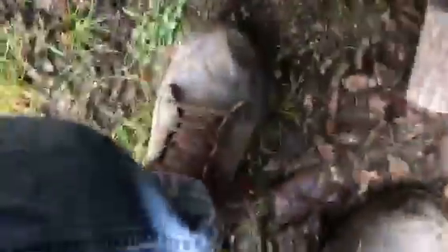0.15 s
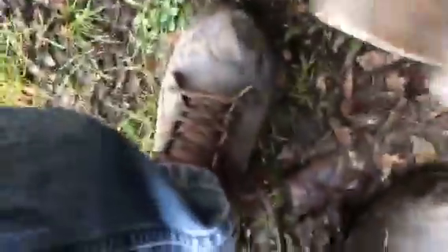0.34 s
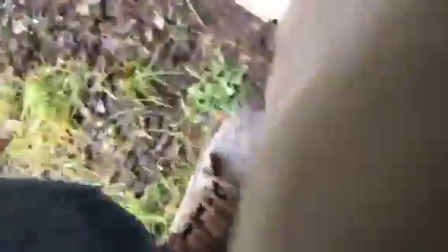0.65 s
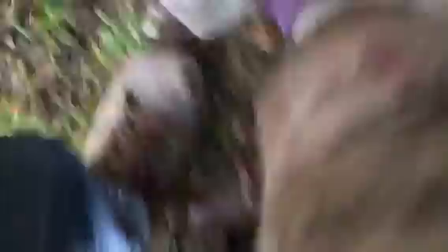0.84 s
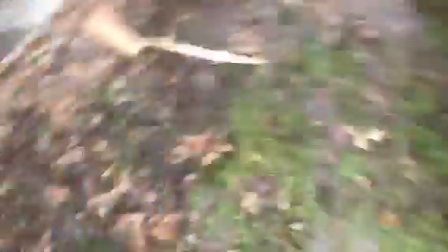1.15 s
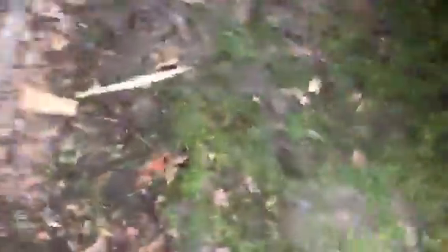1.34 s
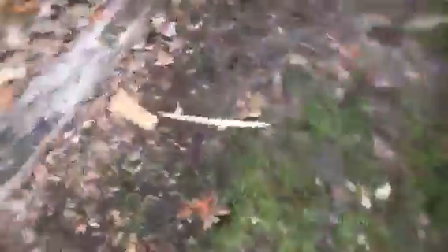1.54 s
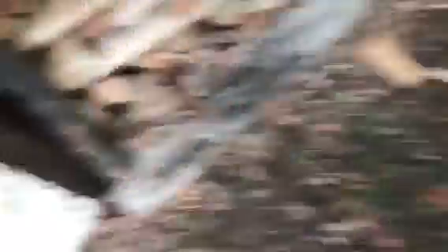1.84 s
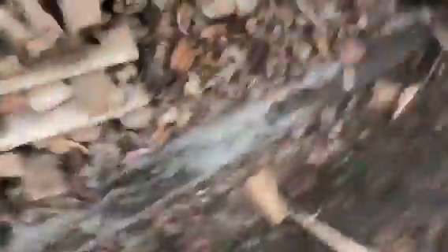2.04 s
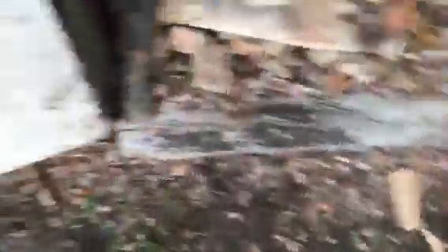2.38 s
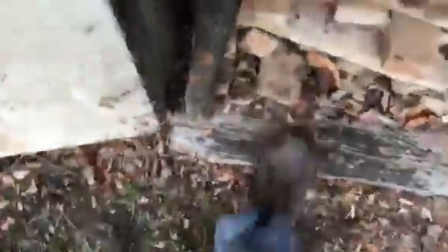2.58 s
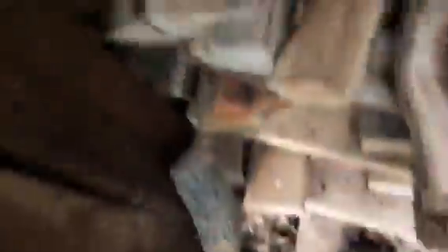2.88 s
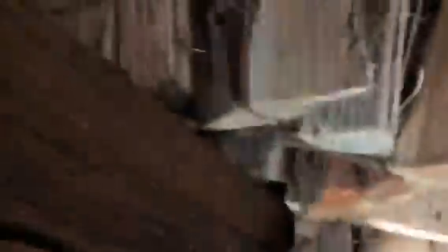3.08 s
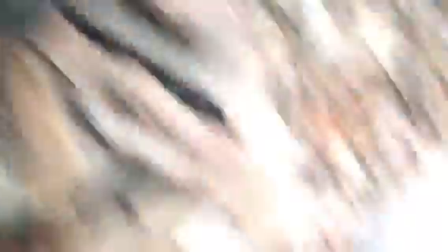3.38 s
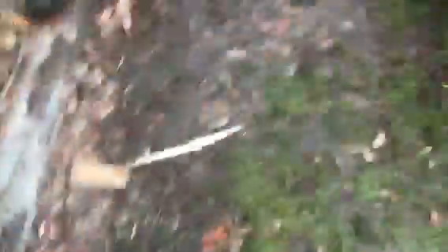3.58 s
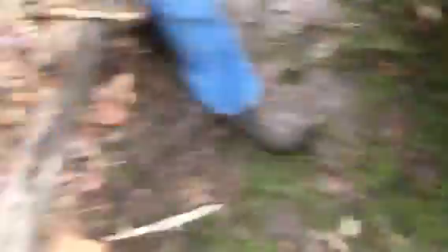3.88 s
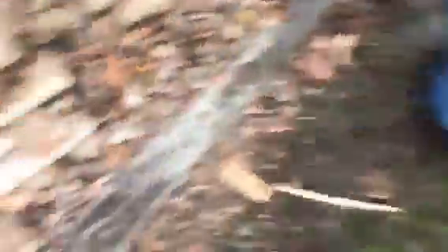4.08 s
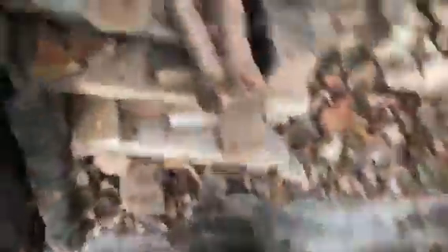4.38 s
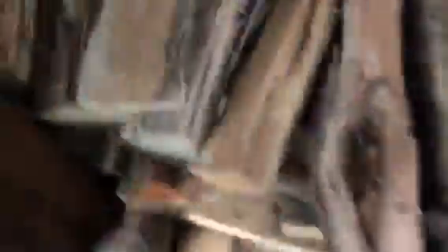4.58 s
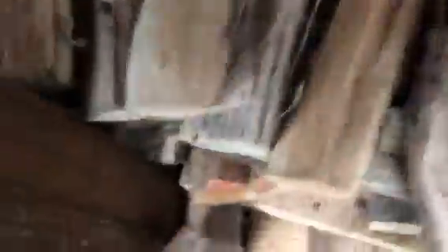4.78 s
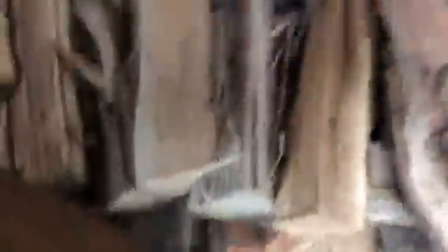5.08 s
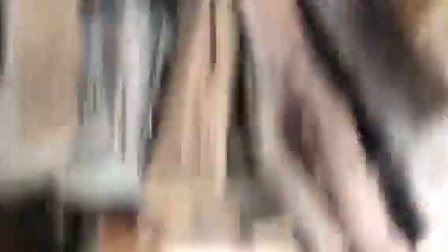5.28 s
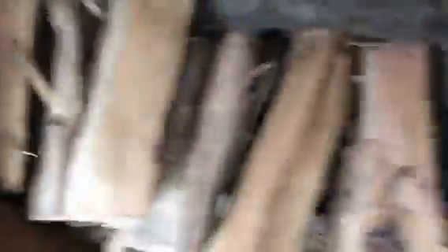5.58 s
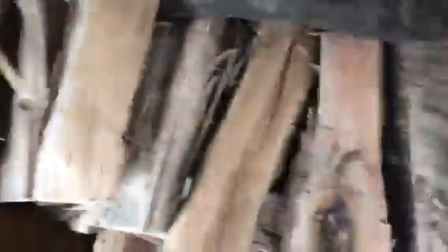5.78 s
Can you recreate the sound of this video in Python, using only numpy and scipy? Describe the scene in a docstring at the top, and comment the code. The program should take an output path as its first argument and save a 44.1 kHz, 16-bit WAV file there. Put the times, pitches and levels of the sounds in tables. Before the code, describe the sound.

A soft scrape of grit and light rustle opens, then a dull log thump lands near half a second. A much louder, sharp double crack follows around 1.6 seconds, then mostly small scuffs. From about 3.9 seconds, hard woody clacks come more often as pieces are stacked. Outdoors, dry, close small microphone, with quiet distant rumble.

```python
"""A brush of grit and a light rustle come first; then split logs and old boards land, close to the microphone.
They are stacked by hand outdoors: each piece lands with a few quick contacts that ring the dry wood.
Each contact excites decaying wood modes, with noise for its crack and rattle and a diffuse tail from the pile.
Boots, leaves and clothes are shaped noise between the blows; a few faint thin whistles are wavering sines.
A low distant rumble of filtered noise lies behind, with small dull bumps of handled wood."""
import sys
import numpy as np
from scipy import signal
from scipy.fft import rfft, irfft
from scipy.io import wavfile
from scipy.ndimage import uniform_filter1d

SR = 44100
rng = np.random.default_rng(int(sys.argv[2]) if len(sys.argv) > 2 else 0)


def bounce(signal):
    """Save signal as a 16-bit WAV file at the path given by the first command-line argument."""
    frames = np.transpose(np.atleast_2d(signal))
    limited = np.clip(frames, -1, 1)
    pcm = np.round(limited * 32767).astype(np.int16)
    wavfile.write(sys.argv[1], SR, pcm)


N = 261513

# Contacts of wood on wood; levels are relative, before the offsets in the knock functions:
# start_s, knock_db, piece_hz, piece_ring_db, thud_db, clack_db, chatter_s
WOOD_CONTACTS = [(0.43, -49, 1063, -25.5, -40, -27, 0.011), (0.436, -44, 294, -13, -17, -48, 0.0045),
                 (0.446, -12, 283, -22, -14, -26.5, 0.0039), (0.456, -18, 300, -13, -20.5, -28, 0.0047),
                 (0.466, -26.5, 353, -20.5, -27, -33, 0.015), (0.535, -36.5, 292, -47, -44, -44, 0.0037),
                 (0.765, -37.5, 380, -31.5, -38.5, -41, 0.0069), (0.846, -44, 557, -33, -51, -70, 0.0021),
                 (0.94, -60, 342, -47, -30, -45, 0.0013), (1.14, -32.5, 460, -32.5, -60, -42, 0.0032),
                 (1.377, -51, 840, -34.5, -47, -33.5, 0.0052), (1.578, -1.5, 1250, -25, -13.5, -5, 0.0044),
                 (1.592, -4, 491, -3, -16, -4.5, 0.0061), (1.602, -2, 448, -16, -26, -16, 0.0025),
                 (1.624, -26, 294, -15.5, -28, -36, 0.0041), (1.635, -19.5, 510, -31, -20, -28.5, 0.0052),
                 (1.693, -32, 415, -40, -34, -40, 0.009), (2.129, -40.5, 2290, -37.5, -73, -43.5, 0.0017),
                 (2.764, -22.5, 514, -23.5, -43, -52, 0.0016), (2.772, -27, 580, -30, -39.5, -54, 0.0018),
                 (3.486, -60, 199, -47.5, -39, -63, 0.0075), (3.53, -50, 305, -52.5, -38, -60, 0.023),
                 (3.872, -19, 1670, -17, -25, -25, 0.0037), (3.881, -12.5, 1617, -8, -30, -4, 0.0026),
                 (3.896, -17.5, 256, -10.5, -18.5, -22.5, 0.0054),
                 (4.045, -17, 766, -27.5, -24, -33.5, 0.0021), (4.248, -15, 1194, -15.5, -19, -19.5, 0.005),
                 (4.258, -16, 650, -15.5, -25, -39, .0028), (4.539, -28.5, 443.4, -26.5, -37, -37.5, 0.01),
                 (4.899, -39, 1143, -42.5, -67, -37, 0.011), (5.002, -26, 2290, -19.5, -39, -43, 0.016),
                 (5.007, -18.5, 312, -13.5, -26.5, -25, 0.0055), (5.015, -25.5, 618, -23, -43, -26, .012),
                 (5.173, -26, 329.3, -13, -27.5, -27, 0.0017), (5.216, -21, 1090, -19.5, -40, -34, 0.0016),
                 (5.225, -15.5, 2140, -3.5, -32, -13.5, 0.0023), (5.237, -17.5, 2310, -36, -42, -39, .0043),
                 (5.307, -38.5, 2320, -39.5, -53, -43, 0.0029), (5.691, -29.5, 617, -39, -41, -54, 0.0024),
                 (5.821, -13.5, 1307, -18, -31, -28.5, 0.0012), (5.892, -39, 2210, -32, -37, -49, 0.015)]
# Modes of the stacked wood: pitch_hz, level_db (relative)
STACK_MODES = [(105, -9.5), (139, 3.5), (190, -3), (240, 2), (307, -0.2), (355, -0.5), (434, 1.7), (513, 1),
               (620, 4), (725, -3.5), (771, 2.5), (855, -4), (910, -3.5), (1044, -5.5), (1217, 5),
               (1353, 1), (1478, -4), (1600, 0.5), (1850, -2.5), (2010, 1.5), (2230, -3.5), (2513, 1),
               (2700, -3.5), (3015, 4.5), (3377, -8), (3748, -1.5), (4200, -22.5), (4800, 0), (5400, -1),
               (6200, -4)]
# Free ringing time of the stack, before damping by the landing piece: pitch_hz, t60_s
STACK_T60 = [(100, 0.12), (260, 0.1), (700, 0.03), (1800, 0.039), (5000, 0.028)]
# How long a landing piece rings, by its pitch: pitch_hz, t60_s
PIECE_RING_T60 = [(300, 0.04), (1200, 0.064), (2300, 0.032)]
# Band edges of the rattle of bark and splinters: pitch_hz, level_db (relative)
RATTLE_BAND = [(60, -21.5), (250, 0.5), (3000, -0.5), (7000, -8), (16000, -22)]
# Decay of the shaken pile and ground: pitch_hz, t60_s
PILE_T60 = [(100, 0.63), (260, 0.18), (700, 0.13), (1840, 0.1), (4850, 0.059)]
# Scuffs of boots, bark and leaves; level before the offset in scuff(), breadth is the height of the skirts:
# start_s, level_db, hump_hz, breadth_db, length_s
GRIT_SCUFFS = [(0.0198, -30.5, 7200, -6, 0.014), (0.099, -40.5, 2480, -35, 0.025),
               (0.156, -42.5, 2850, -37, 0.023), (0.339, -40.5, 2820, -43, 0.024),
               (0.504, -40, 6470, -9, 0.057), (0.554, -39, 3950, -23, 0.032),
               (0.768, -29.5, 4270, -8.5, 0.02), (1.048, -38, 3030, -7, 0.051),
               (1.113, -34, 8700, 0.5, 0.031), (1.539, -41.5, 3870, -10, 0.031),
               (1.659, -35.5, 5070, -13, 0.015), (1.714, -44, 2850, -21, 0.021),
               (1.853, -31.5, 5020, -8.5, 0.021), (1.878, -42.5, 3520, -15, 0.039),
               (1.9322, -32.5, 7940, -6, 0.028), (1.984, -44, 5060, -12, .0073),
               (2.17, -37, 4660, -4, 0.01), (2.203, -33.5, 5000, -17, 0.013),
               (2.2173, -27, 6440, -6, 0.012), (2.3496, -46, 9250, -11, 0.025),
               (2.704, -38.5, 2560, -7, 0.0088), (2.93, -38, 7030, 1, 0.022),
               (2.968, -35, 4070, -15, 0.011), (3.006, -39.5, 3150, -4, 0.048),
               (3.053, -32.5, 3240, -6.5, 0.032), (3.162, -38.5, 2240, -8, 0.013),
               (3.1944, -35.5, 2700, -8, 0.033), (3.23, -42.5, 5580, -13, .018),
               (3.297, -41, 5760, -10, .005), (3.395, -35.5, 2140, -7, 0.032),
               (3.4316, -34, 2330, -9, .023), (3.459, -37.5, 3280, -12, 0.028),
               (3.496, -39.5, 4400, -12, 0.032), (3.683, -36, 5300, -13, 0.023),
               (3.772, -40, 9100, -8, 0.024), (4.163, -38.5, 7240, -4.5, 0.02),
               (4.4846, -45.5, 3240, -16, .023), (4.6455, -37.5, 2630, -5, 0.0063),
               (4.975, -37.5, 4490, -10, 0.0044), (5.079, -40, 5600, -12, 0.0056),
               (5.09, -38, 5420, -16, .004), (5.104, -41, 5300, -18, 0.0036),
               (5.126, -46, 2110, -25, 0.019), (5.19, -27, 2060, -17, .022),
               (5.677, -32.5, 2600, -6, 0.0077), (5.694, -33.5, 2170, -10, 0.011),
               (5.9105, -28, 2150, -14, 0.034)]
# A sleeve or bark slides along the wood: start_s, length_s, colour_hz, level_db
SLIDES = [(3.123, 0.13, 2170, -48.5), (3.14, 0.062, 5700, -48), (3.412, 0.086, 2480, -65),
          (3.603, 0.048, 1010, -49), (5.885, 0.11, 2040, -42.5)]
# Faint thin tones: start_s, length_s, pitch_hz, level_db
FAINT_TONES = [(0.976, 0.042, 594, -41), (1.419, 0.065, 3930, -54), (1.466, 0.032, 3980, -54),
               (1.507, 0.022, 3860, -58), (2.032, 0.04, 5300, -56), (2.063, 0.044, 5270, -56),
               (2.096, 0.023, 5210, -47), (5.308, 0.03, 2270, -51)]
# The stacker's movement, heard as rustle, over the rumble: start_s, rustle_db, rumble_db
MOVEMENT = [(0.0, -55, -51.5), (0.28, -61.5, -54.5), (0.63, -57, -50.5), (1.37, -61, -54.5),
            (1.53, -59.5, -57), (1.8, -63, -54), (2.01, -61.5, -53), (2.46, -63.5, -57.5),
            (2.89, -61, -51.5), (3.09, -52, -52), (3.35, -58.5, -50), (3.85, -54.5, -54),
            (4.1, -62.5, -50.5), (4.38, -67, -55), (4.84, -64, -55.5), (5.14, -57, -48.5),
            (5.48, -63.5, -56.5), (5.93, -50, -56.5)]
# Colour of the bright rustle: pitch_hz, level_db (relative, per Hz)
RUSTLE_COLOUR = [(1760, -28), (3000, -7), (3420, -3.5), (4550, 1.5), (12100, -3), (14600, -2), (15800, -17)]
# Colour of the duller part of the rustle: pitch_hz, level_db (relative, per Hz)
BODY_COLOUR = [(500, -16.5), (900, -18.5), (1500, 3), (2400, 5), (3500, 2), (6000, -32)]
# Colour of the distant rumble: pitch_hz, level_db (relative, per Hz)
RUMBLE_COLOUR = [(15, -76.5), (25, -26), (139, -6), (182, -9), (202, -13.5), (285, -14), (415, -19),
                 (945, -31), (1330, -27.5), (1500, -38), (1950, -74), (3300, -120)]
# Colour of the soft bumps of handled wood: pitch_hz, level_db (relative, per Hz)
BUMP_COLOUR = [(150, -22.5), (350, -1.5), (700, 0), (1400, -12), (3000, -30)]

STACK_DAMPING = 0.77  # the stack rings this share of its free time under the landing piece
RATTLE_DB, RATTLE_S = 9, 0.0053  # rattle gain; its decay time before the chatter is added
RUSTLE_MEAN_DB = -59  # reference level of the rustle
BODY_DB, BODY_FOLLOWS = -63, 0.47  # dull rustle at that reference; share by which it follows the rustle
BUMPS_PER_S, BUMPS_DB = 60, -11  # rate at the reference rustle; level against the rumble
EDGE_HZ = 15900  # upper band limit


def gain_of(db):
    """Decibels to gain."""
    return 10 ** (np.asarray(db) / 20)


def evened(x):
    """Scales to rms 1."""
    return x / np.sqrt(np.mean(x ** 2) + 1e-20)


def read(points, hz):
    """Reads a table on a log-frequency axis."""
    f, value = np.transpose(points)
    return np.interp(np.log(hz + 1), np.log(f + 1), value)


def add(mix, start_s, sound):
    """Mixes a sound in at a time."""
    part = mix[round(start_s * SR):][:len(sound)]
    part += sound[:len(part)]


def coloured(x, points):
    """Gives a signal the colour of a spectrum, rms 1."""
    bins_hz = np.fft.rfftfreq(len(x), 1 / SR)
    return evened(irfft(rfft(x) * gain_of(read(points, bins_hz)), len(x)))


def touches(t, fade):
    """Wood meets wood in a fading, irregular chatter of micro-contacts, scaled to unit energy."""
    contacts = fade * rng.standard_normal(len(t)) * (rng.random(len(t)) < .04)
    contacts[0] = 0.99  # sets the first touch before scaling
    return contacts / np.linalg.norm(contacts)


def wood_ring(t, contacts, colour, piece_hz, piece_db):
    """The contacts drive decaying sine modes of the landing piece and the stack."""
    # every stack mode is a close, beating cluster of three
    stack_hz, stack_db = np.transpose(STACK_MODES * 3)
    # each blow detunes the modes a little, for a dense, irregular ring
    stack_hz = stack_hz * (1 + .045 * rng.standard_normal(len(stack_hz)))
    piece_modes_hz = piece_hz * np.array([.9, 1, 1.09])
    mode_hz = np.append(stack_hz, piece_modes_hz)[:, None]
    mode_db = np.append(stack_db + read(colour, stack_hz), piece_db - np.array([11, 5, 11]))[:, None]
    t60 = read(STACK_T60, mode_hz) * STACK_DAMPING
    t60[len(stack_hz):] = read(PIECE_RING_T60, piece_hz)

    signs = rng.choice([-1., 1.], mode_hz.shape)  # where the blow falls sets each mode's polarity
    struck = contacts != 0
    reach = abs(np.exp(-2j * np.pi * mode_hz * t[struck]) @ contacts[struck])[:, None]
    drive = signs / (reach + 0.089) ** 0.92  # evens out how strongly the chatter drives each mode
    rise = 1 - np.exp(-t * mode_hz / 0.47)  # wood gives a little: each mode swells over a cycle
    decay = gain_of(mode_db - 60 * t / t60)
    modes = drive * rise * decay * np.sin(2 * np.pi * mode_hz * t)
    return signal.fftconvolve(contacts, modes.sum(0))[:len(t)]


def dry_crack(t, fade, crack_db):
    """The dry crack of a blow: a short burst of bright noise with a brief tail."""
    crack = coloured(rng.standard_normal(len(t)), [(1500, -34.5), (4000, -5), (9000, -5), (16000, -15.5)])
    swell = 1 - np.exp(-t / 0.00056)
    return crack * gain_of(crack_db - 5.5) * (fade + 0.1 * np.exp(-t / 0.0035)) * swell


def bark_rattle(t, colour, chatter_s):
    """Bark and splinters rattle under the blow: decaying noise that shares its colour."""
    bins_hz = np.fft.rfftfreq(len(t), 1 / SR)
    bin_gain = gain_of(read(colour, bins_hz) + read(RATTLE_BAND, bins_hz))
    rattle = irfft(rfft(rng.standard_normal(len(t))) * bin_gain, len(t))
    swell = 1 - np.exp(-t / .001)
    return rattle * gain_of(RATTLE_DB) * np.exp(-t / (RATTLE_S + chatter_s)) * swell


def knock(knock_db, piece_hz, piece_db, thud_db, clack_db, chatter_s):
    """A short chatter rings the piece and the stack; a dry crack and a rattle ride on top."""
    t = np.arange(6144) / SR
    fade = np.exp(-t / np.clip(chatter_s, .0003, .03))
    contacts = touches(t, fade)
    crack_db = clack_db - 5.5
    colour = [(200, thud_db - 10), (800, knock_db - 12.5), (2600, clack_db - 15.5), (7000, crack_db - 11)]
    ring = wood_ring(t, contacts, colour, piece_hz, piece_db)
    return ring + dry_crack(t, fade, crack_db) + bark_rattle(t, colour, chatter_s)


def pile(x):
    """The stack shakes on after a blow: a diffuse tail whose bass lasts longest."""
    hz, t, z = signal.stft(rng.standard_normal(SR // 2), SR, nperseg=256)
    decay = gain_of(-60 * t / read(PILE_T60, hz)[:, None])
    tail = signal.istft(z * decay, SR, nperseg=256)[1]
    tail[:200] = 0  # the direct blow comes first
    return signal.fftconvolve(x, tail / np.linalg.norm(tail))[:N]


def scuff(level_db, hz, breadth_db, length_s):
    """A brush of grit: grainy noise with a hump over broad skirts, swelling, then fading."""
    t = np.arange(6144) / SR
    grain_db = 4.2 * evened(uniform_filter1d(rng.standard_normal(len(t)), 40))
    grit = rng.standard_normal(len(t)) * gain_of(grain_db)
    hump = [(hz * 0.96, -6), (hz, 0), (hz * 1.1, -6)]
    low_skirt = [(300, breadth_db - 5.5), (1200, breadth_db - 0.5)]
    air_skirt = [(12500, breadth_db - 0.5), (16000, breadth_db - 1.5)]
    brush = coloured(grit, sorted(low_skirt + hump + air_skirt))
    u = t / np.clip(length_s, .001, .06)
    return gain_of(level_db - 6.5) * brush * (1 - np.exp(-u / 0.11)) * np.exp(-u ** 2)


def swish(length_s, hz, level_db):
    """A slide that swells and fades: grainy noise in one broad resonance."""
    t = np.arange(0, length_s, 1 / SR)
    resonance = [(hz * 0.66, -30), (hz * 0.8, -4), (hz, 0), (hz * 1.38, -4), (hz * 2.9, -30)]
    band = coloured(rng.standard_normal(len(t)), resonance)
    grain_db = 3.2 * evened(uniform_filter1d(rng.standard_normal(len(t)), 120))
    grain = evened(gain_of(grain_db))
    return gain_of(level_db) * band * grain * signal.windows.tukey(len(t), .7)


def whistle(length_s, hz, level_db):
    """A brief sine of wavering pitch that swells and fades."""
    t = np.arange(0, length_s, 1 / SR)
    wobble = 1 + 0.02 * evened(uniform_filter1d(rng.standard_normal(len(t)), 150))
    phase = 2 * np.pi * np.cumsum(hz * wobble) / SR
    return gain_of(level_db) * np.sin(phase) * np.hanning(len(t))


def hiss(points, patchy_db, flicker_db):
    """Noise with drifting patches in time and pitch, and a flicker shared by all bands."""
    frames, hz = N // 128 + 5, np.fft.rfftfreq(512, 1 / SR)
    real, imag, patches = rng.standard_normal((frames, 257, 3)).T
    patches = evened(uniform_filter1d(uniform_filter1d(patches, 12, 0), 10, 1))
    flicker = evened(uniform_filter1d(rng.standard_normal(frames), 3))
    level_db = read(points, hz)[:, None] + patchy_db * patches + flicker_db * flicker
    z = (real + 1j * imag) * gain_of(level_db)
    return evened(signal.istft(z, nperseg=512, noverlap=384)[1][:N])


def clothes_and_leaves(rustle_db):
    """Clothes and leaves rub as bright and dull noise; dry leaves crackle in sparse random snaps."""
    rustle = gain_of(rustle_db) * hiss(RUSTLE_COLOUR, 3.0, 2.8)
    snaps = gain_of(4.4 * np.minimum(rng.exponential(1, N), 4))
    snaps *= rng.random(N) < 150 / SR  # about 150 a second
    crackle = coloured(snaps * rng.choice([-1., 1.], N), RUSTLE_COLOUR)
    body_db = BODY_DB + BODY_FOLLOWS * (rustle_db - RUSTLE_MEAN_DB)
    body = gain_of(body_db) * hiss(BODY_COLOUR, 2.2, 2.1)
    return rustle + gain_of(rustle_db - 7.5) * crackle + body


def handled_wood(rustle_db):
    """Wood bumps softly: short dull noise bursts, more of them with more rustle."""
    taps = gain_of(2.5 * np.minimum(rng.exponential(1, N), 3))
    taps *= rng.random(N) < BUMPS_PER_S * gain_of(2 * (rustle_db - RUSTLE_MEAN_DB)) / SR
    decay = np.exp(-np.arange(800) / SR / 0.01)
    jolts = signal.oaconvolve(taps, decay)[:N] * rng.standard_normal(N)
    return gain_of(BUMPS_DB) * coloured(jolts, BUMP_COLOUR)


def distant_rumble():
    """Low noise whose strength drifts in slow lumps."""
    drift = uniform_filter1d(uniform_filter1d(rng.standard_normal(N), 600), 600)
    lumps = gain_of(2.3 * evened(drift))
    return coloured(lumps * rng.standard_normal(N), RUMBLE_COLOUR)


def handling():
    """The stacker's rustle and soft bumps over the distant rumble, following the movement levels."""
    s, *columns = np.transpose(MOVEMENT)
    rustle_db, rumble_db = (np.interp(np.arange(N) / SR, s, column) for column in columns)
    low = distant_rumble() + handled_wood(rustle_db)
    return clothes_and_leaves(rustle_db) + gain_of(rumble_db) * low


def scene():
    """Wood and its tail, scuffs, swishes, whistles and the background."""
    wood = np.zeros((4, N))  # four differing diffuse tails, shared out among the contacts in turn
    rest = handling()
    for k, (s, *row) in enumerate(WOOD_CONTACTS):
        add(wood[k % len(wood)], s, knock(*row))
    for source, rows in ((scuff, GRIT_SCUFFS), (swish, SLIDES), (whistle, FAINT_TONES)):
        for s, *row in rows:
            add(rest, s, source(*row))
    shaken = sum(share + gain_of(-17) * pile(share) for share in wood)
    return (shaken + rest)[None]


def record(dry):
    """The small microphone drops the deep bass, the loudest blows are softly squeezed; then the band limit."""
    heard = signal.sosfilt(signal.butter(2, 75, "high", fs=SR, output="sos"), dry)
    squeezed = 1.2 * np.tanh(heard / 1.2)
    band_limit = signal.firwin(511, EDGE_HZ, window=("kaiser", 9), fs=SR)
    return signal.oaconvolve(squeezed, band_limit[None], "same")


dry = scene()
out = record(dry)
bounce(out)
```